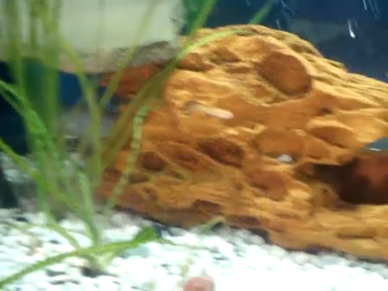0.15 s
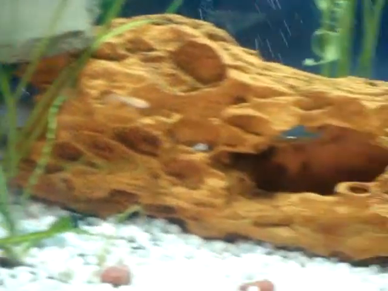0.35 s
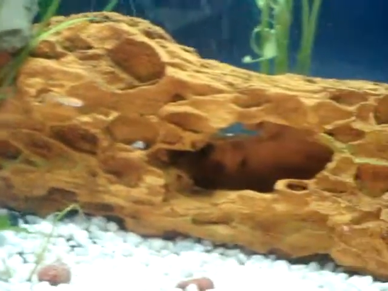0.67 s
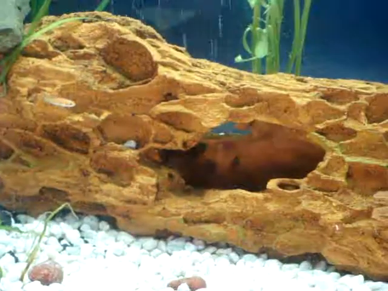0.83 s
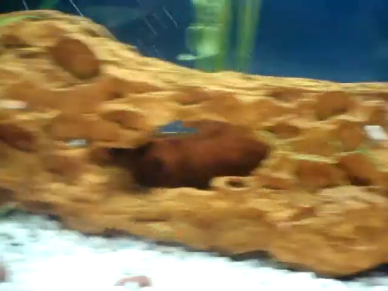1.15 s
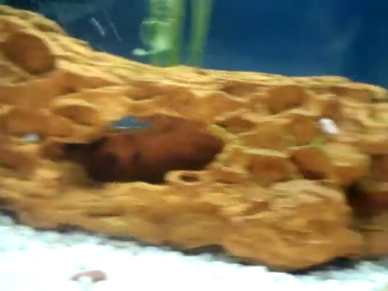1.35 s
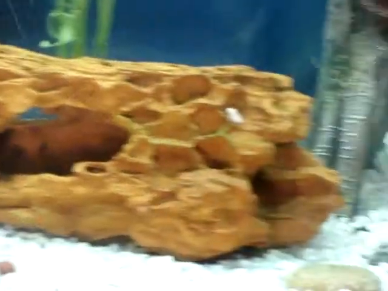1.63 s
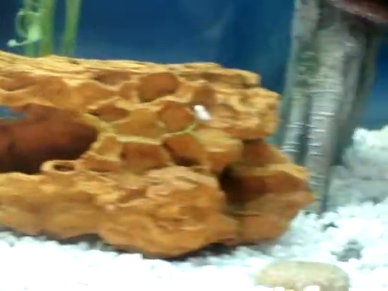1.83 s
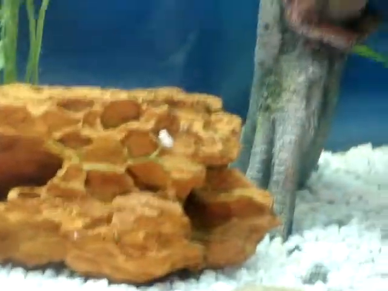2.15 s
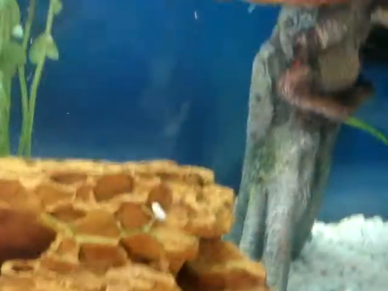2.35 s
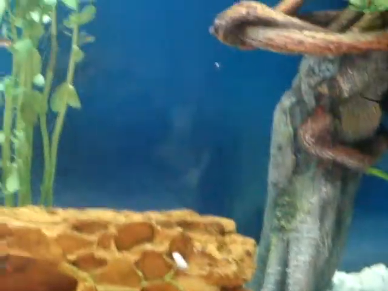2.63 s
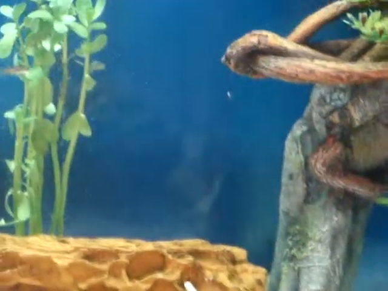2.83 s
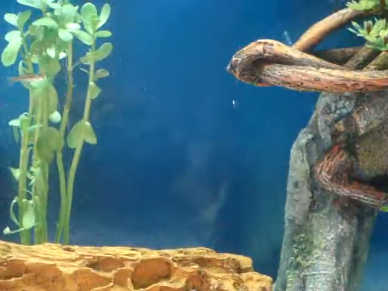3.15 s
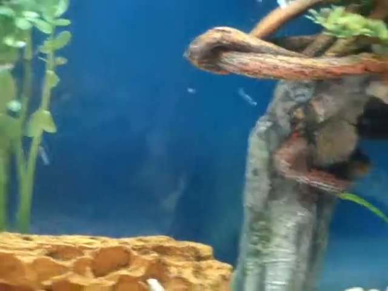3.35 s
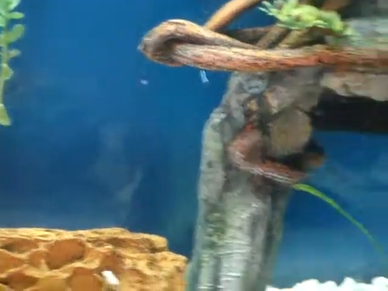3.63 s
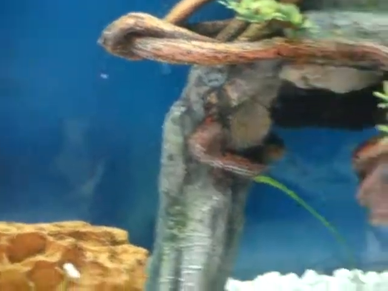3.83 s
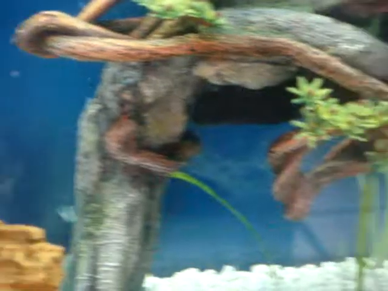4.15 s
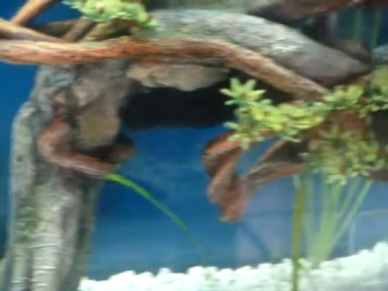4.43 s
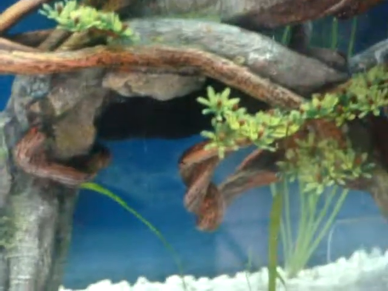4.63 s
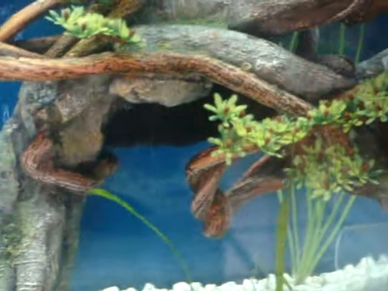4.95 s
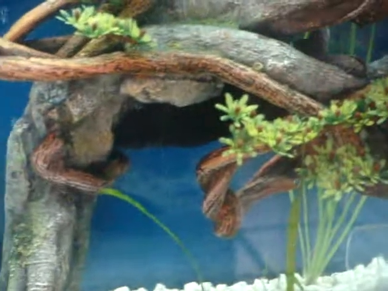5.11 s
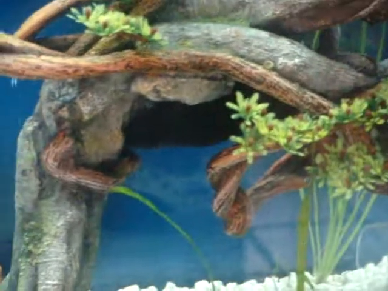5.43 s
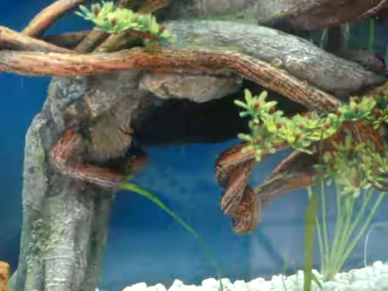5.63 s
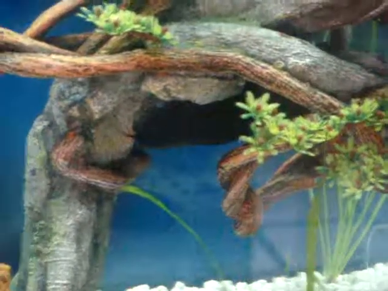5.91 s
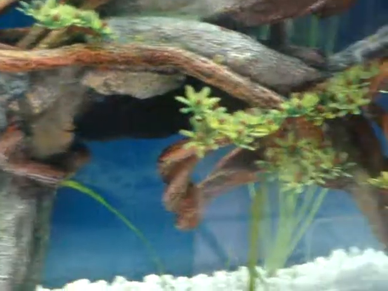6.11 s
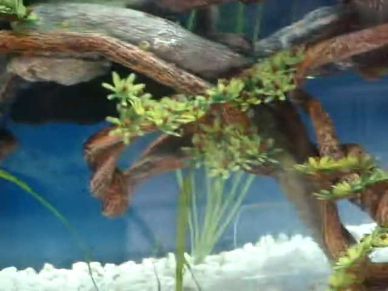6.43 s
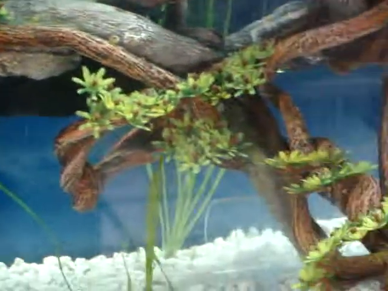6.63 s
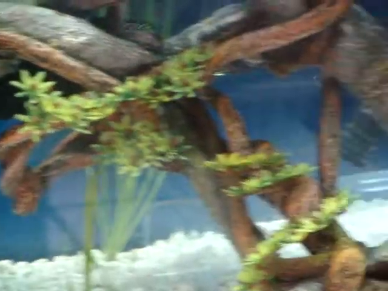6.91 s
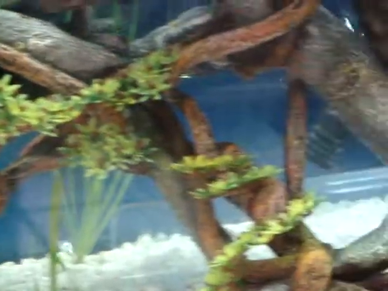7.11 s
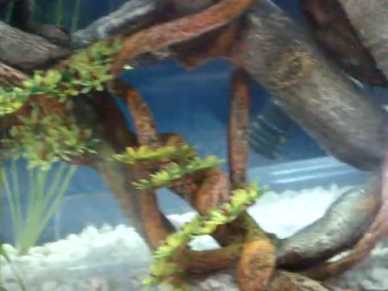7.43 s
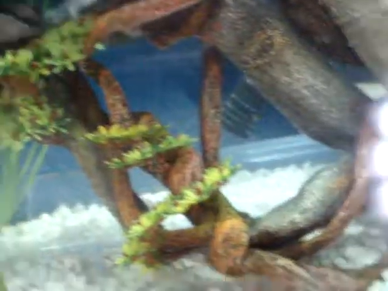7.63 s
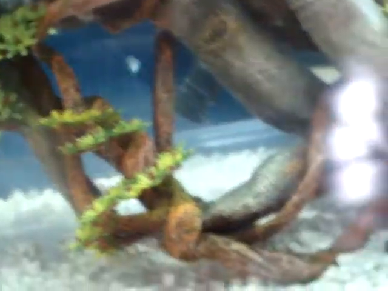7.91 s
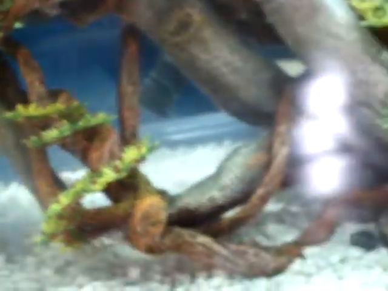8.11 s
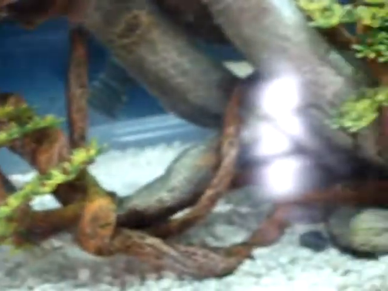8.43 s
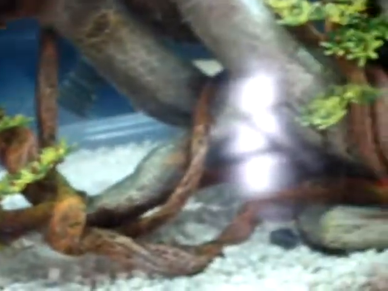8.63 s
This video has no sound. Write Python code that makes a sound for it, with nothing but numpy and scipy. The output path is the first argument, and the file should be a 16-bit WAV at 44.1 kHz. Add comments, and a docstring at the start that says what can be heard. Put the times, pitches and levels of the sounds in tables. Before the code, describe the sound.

Watery bubble pops and bright trickling fizz over a low, steady pump hum, with two tiny dry ticks and one sharp ringing knock near the start.

```python
"""A home aquarium: filter pump tones and filtered-noise flow run throughout, with an outflow trickle of bubble swarms.
Single bubbles, damped sines with gurgle and noise spray, ring and burst over the fizz from early on.
Two sharp ticks, millisecond noise snaps, sound close by near 1 s and 1.2 s.
At 1.5 s something hard scrapes briefly, then clacks against the tank: noise contacts, ringing modes, bright rustle."""
import sys
import numpy as np
from scipy import signal
from scipy.fft import rfft, irfft
from scipy.io import wavfile

SR = 44100
rng = np.random.default_rng(int(sys.argv[2]) if len(sys.argv) > 2 else 0)


def to_wav(s):
    """Save 16-bit WAV."""
    ch = np.atleast_2d(s).T  # columns
    pcm = np.round(np.clip(ch, -1, 1) * 32767)  # PCM
    wavfile.write(sys.argv[1], SR, pcm.astype(np.int16))


N = 386316
T = np.arange(N) / SR
SHOT = T[:SR // 2]  # time axis of one short event

# Colour of bubble spray and of the knock's rustle. Each row: frequency in Hz, relative gain in dB.
SPRAY_COLOUR = [(1000, -21), (2200, -6.5), (3500, -2), (4500, -3.5), (5900, 0.5), (7600, -0.5),
                (10000, -11)]


def undb(db):
    """Decibels to amplitude ratio."""
    return 10 ** (np.asarray(db) / 20)


def level(x, db):
    """Set the rms of a steady sound."""
    return x * undb(db) / np.std(x)


def strength(x, db):
    """Set an event's energy, as the rms it would have if spread over 30 ms."""
    return x * undb(db) / np.sqrt(np.sum(x ** 2) / (0.03 * SR))


def fade(t60_s):
    """Exponential decay, 60 dB in t60_s."""
    return np.exp(-np.log(1000) * SHOT / max(t60_s, 1e-4))


def hiss(t60_s):
    """White noise with exponential decay."""
    return rng.standard_normal(len(SHOT)) * fade(t60_s)


def add(out, start_s, x):
    """Mix an event into out at start_s."""
    i = max(int(start_s * SR), 0)
    out[i:i + len(x)] += x[:max(N - i, 0)]


def colour(x, points, size=4096):
    """Minimum-phase filter through (Hz, dB) points, built by folding the cepstrum."""
    hz, db = np.transpose(points)
    bin_hz = np.maximum(np.arange(size // 2 + 1) * SR / size, 1)
    gain_db = np.interp(np.log(bin_hz), np.log(hz), db)
    cepstrum = irfft(np.log(undb(gain_db)))
    cepstrum[1:size // 2] *= 2
    cepstrum[size // 2 + 1:] = 0
    impulse = irfft(np.exp(rfft(cepstrum)))
    return signal.fftconvolve(x, impulse)[:len(x)]


def echoes(x, hood_db, room_db, hood_t60_s=0.031, room_t60_s=0.14):
    """Direct sound, quick reflections between water, glass and hood, then the room; a new random pattern per call."""
    hood = hiss(hood_t60_s)
    room = hiss(room_t60_s) * (1 - fade(0.01))
    response = undb(hood_db) * hood / np.linalg.norm(hood)
    response += undb(room_db) * room / np.linalg.norm(room)
    response[0] += 1
    return signal.fftconvolve(x, response)[:len(x)]


def pump():
    """Mains multiples and a thin whine, each wavering in level and phase with load, over rushing water as noise."""
    # Multiples of the mains frequency. Each row: multiple, mean rms level in dB.
    hum = [(2, -73.5), (3, -85.5), (4, -63), (5, -62.5), (6, -68), (7, -71.5), (8, -67.5), (10, -66.5),
           (11, -65), (12, -67), (18, -72)]
    # Flow through the filter box. Each row: frequency in Hz, relative gain in dB.
    flow_colour = [(25, -15.5), (65, -9), (100, -8.5), (160, -4.5), (270, -0.5), (400, -1), (540, -1.5),
                   (660, 6.5), (800, -1), (1000, -0.5), (1250, -5), (1550, -2), (2000, -7), (3000, -4.5),
                   (9500, -21)]
    mains_hz, whine_hz, whine_db = 60, 1450.8, -67.5
    waver_db, waver_rad, waver_points = 1.46, 0.096, 60

    out = level(colour(rng.standard_normal(N), flow_colour), -49.5)
    tones = [(k * mains_hz, db) for k, db in hum] + [(whine_hz, whine_db)]
    for hz, db in tones:
        load = np.interp(T, np.linspace(0, T[-1], num=waver_points), rng.standard_normal(size=waver_points))
        amplitude = np.sqrt(2) * undb(db + waver_db * load)
        out += amplitude * np.sin(2 * np.pi * hz * T + waver_rad * load)
    return out


def ring(hz, t60_s, rise, size=len(SHOT)):
    """A bubble's damped sine: swells over the first few cycles; pitch rises by fraction `rise` nearing the surface."""
    t = SHOT[:size]
    pitch_hz = hz * (1 + rise * (1 - np.exp(-2 * t / t60_s)))
    swell = 1 - np.exp(-hz * t / 2)
    decay = np.exp(-np.log(1000) * t / t60_s)
    return swell * np.sin(2 * np.pi * np.cumsum(pitch_hz) / SR) * decay


def swarm(per_s, low_hz, high_hz, cycles, spread_db):
    """Small bubbles of random pitch and strength at random moments, each with a t60 of `cycles` periods."""
    out = np.zeros(N)
    for when, size, force in rng.random((int(per_s * N / SR), 3)):
        hz = min(low_hz * (high_hz / low_hz) ** size, SR / 3)
        db = -spread_db * np.log(max(force, 0.02))  # few are strong
        add(out, when * N / SR, undb(db) * ring(hz, cycles / hz, rise=0.07, size=2048))
    return out


def trickle(spots=4):
    """The outflow breaks the surface at several spots: dense fizz, livelier little pops and soft plinks."""
    # Fizz on the surface. Each row: frequency in Hz, relative gain in dB.
    fizz_colour = [(1200, -30), (2000, -11), (2800, -11), (3600, -3.5), (4500, 1), (5600, 2.5), (7000, 1),
                   (8200, -0.5), (10000, -4.5)]
    fizz = np.zeros(N)
    for _ in range(spots):
        spot = swarm(per_s=260, low_hz=1860, high_hz=10440, cycles=9.7, spread_db=2.0)
        fizz += echoes(spot, hood_db=7.5, room_db=-6.0)
    pops = swarm(per_s=17, low_hz=4760, high_hz=9330, cycles=40, spread_db=2.0)
    plinks = swarm(per_s=6, low_hz=2640, high_hz=4030, cycles=130, spread_db=2.0)

    out = level(colour(fizz, fizz_colour), -50.5)
    out += level(echoes(pops, hood_db=3.0, room_db=4.5), -57.0)
    out += level(echoes(plinks, hood_db=5.0, room_db=7.5), -63.5)
    return out


def bubble(hz, db, spray_db, gurgle_db=1, gurgle_follows=0.24, wobble=0.084, gurgle_cycles=28, count=6):
    """A bubble rings longer the lower its pitch, sheds others near its pitch that gurgle on, and throws a little spray."""
    ref_t60_s, ref_hz, slope = 0.078, 3010, 1.5
    spray_t60_s, spray_attack_s = 0.042, 0.0024
    t60_s = min(ref_t60_s * (ref_hz / hz) ** slope, 0.5)
    note = echoes(ring(hz, t60_s, rise=0.0092), hood_db=-1.5, room_db=-6.0)

    # shed bubbles start within a third of t60_s, weaker the later
    shed = np.zeros(len(SHOT))
    for delay_s in np.linspace(0, t60_s / 3, num=count) * rng.random(count):
        shed_hz = hz * (1 + wobble * rng.uniform(-1.17, 1))
        brief = ring(shed_hz, gurgle_cycles / hz, rise=0)
        delayed = np.pad(brief, (int(delay_s * SR), 0))[:len(SHOT)]
        shed += np.exp(-4 * delay_s / t60_s) * delayed
    gurgle = echoes(shed, hood_db=1.5, room_db=5)

    burst = hiss(spray_t60_s) * (1 - np.exp(-SHOT / spray_attack_s))
    spray = echoes(colour(burst, SPRAY_COLOUR), hood_db=6.0, room_db=-2.5)

    # more spray, more gurgle
    voice = strength(note, 0) + strength(gurgle, gurgle_db + gurgle_follows * spray_db)
    return strength(voice, db) + strength(spray, db + spray_db)


def bubbles():
    """Prominent bubbles at set times; faint ones of random pitch, one at a random moment of each equal time slot."""
    # Each row: start in seconds, pitch in Hz, level in dB, burst spray relative to the ring in dB.
    prominent = [ (.254, 2850, -39.5, -7), (0.458, 3420, -44.5, -12), (.810, 5000, -51, 3),
                 (1.363, 5250, -46, -3), (1.534, 2580, -36.5, -6), (1.546, 3160, -43, -14),
                 (1.864, 2980, -42.5, -22), (1.876, 2635, -46, -24), (1.930, 5560, -48, -6),
                 (2.431, 2925, -40, -13), (2.433, 2570, -42.5, -14), (2.581, 2460, -45.5, -4),
                 (2.829, 5900, -46, -9), (3.015, 5600, -47.5, -3), (3.065, 3410, -48, -6),
                 (3.231, 7780, -47, -5), (3.399, 6170, -42.5, 1), (3.468, 5740, -46.5, -5),
                 (3.675, 3420, -42, -8), (3.799, 5330, -45, -1), (4.277, 3570, -47.5, -12),
                 (4.398, 3430, -47.5, 3.5), (4.902, 2933, -39.5, -24), (4.972, 3120, -45, -23),
                 (5.023, 6170, -48.5, 2), (5.083, 2440, -46, 1), (5.089, 1733, -45.5, -13),
                 (5.115, 5550, -42, -6), (5.204, 7480, -46.5, -8), (5.278, 3510, -48, -1),
                 (5.660, 6770, -45.5, 0), (5.728, 5270, -50, 4), (5.826, 2830, -41, -13),
                 (6.013, 6540, -46.5, 1.5), (6.131, 4260, -45, -6), (6.164, 4310, -48, 3.5),
                 (6.447, 2854, -42.5, -5), (6.668, 5670, -40.5, -23), (6.940, 2655, -43.5, -6),
                 (6.993, 3840, -44, -18), (7.026, 2964, -43, -9), (7.086, 3080, -48, -14),
                 (7.262, 2925, -41.5, -21), (7.319, 4150, -46.5, -19), (7.345, 6600, -49.5, -10),
                 (7.397, 5496, -47.5, 3), (7.575, 3090, -44, -30), (7.853, 2370, -46.5, 2.5),
                 (7.902, 3060, -48, -10), (8.058, 4480, -48.5, -20), (8.338, 3014, -46.5, -7),
                 (8.457, 3360, -47.5, 2.5), (8.469, 2190, -43.5, -18), (8.638, 2180, -39.5, -9),
                 (8.674, 3110, -50, -5)]
    faint_count, faint_low_hz, faint_high_hz = 30, 2990, 8000
    faint_db, faint_spread_db, faint_spray_db = -53, 2, -2.5

    out = np.zeros(N)
    for start_s, hz, db, spray_db in prominent:
        add(out, start_s, bubble(hz, db, spray_db))
    for k, (when, size, force) in enumerate(rng.random((faint_count, 3))):
        start_s = (k + when) * T[-1] / faint_count
        hz = faint_high_hz * (faint_low_hz / faint_high_hz) ** size
        db = faint_db + faint_spread_db * (2 * force - 1)
        add(out, start_s, bubble(hz, db, faint_spray_db))
    return out


def ticks():
    """Dry snaps close to the microphone: an impulse plus noise dying in milliseconds, with weak echoes."""
    # Each row: start in seconds, level in dB.
    tick_rows = [(.9890, -35), (1.1810, -45.5)]
    # Each row: frequency in Hz, relative gain in dB.
    tick_colour = [(290, -52), (500, -13), (1620, -19), (3620, 2), (4770, -11), (5410, -17), (7780, -26),
                   (8710, -19), (10000, -21), (13000, -53), (22000, -120)]
    out = np.zeros(N)
    for start_s, db in tick_rows:
        snap = hiss(0.008)
        snap[0] += 7
        add(out, start_s, strength(echoes(colour(snap, tick_colour), hood_db=-6, room_db=-21), db))
    return out


def knock(ring_db=-3, body_db=-3.5, body_t60_s=0.12, tail_db=-11, tail_t60_s=0.36,
          rustle_db=-35, rustle_t60_s=0.47):
    """Rough contacts excite dense short modes, as noise; the full blow rings clear modes, and a bright rustle trails off."""
    # First touch to full blow. Each row: start in seconds, level in dB, length of the push in seconds.
    contacts = [(1.510, -36, 0.049), (1.612, -17, 0.03), (1.620, -17, 0.013)]
    # Struck tank. Each row: frequency in Hz, relative level in dB, t60 in seconds.
    tank_modes = [(214, -21, 0.65), (250, -18, 0.35), (318, -8, 0.24), (460, -9.5, 0.43), (636, -8, 0.27),
                  (1260, -13, 0.42), (1350, -3, 0.3), (1373, -15, 0.26), (1400, -4, 0.28), (1473, 2, 0.25),
                  (1574, -4, 0.27), (1850, -3, 0.23), (2020, -4, 0.24), (2082, 3, .22), (2134, -1, .23),
                  (3110, 1, 0.18), (3600, -8, .16), (3940, -1, 0.25), (3866, 3.5, 0.2), (5370, -2, 0.18),
                  (6270, -3, .12), (6690, 3.5, 0.094)]
    # Dense modes. Each row: frequency in Hz, relative gain in dB.
    knock_colour = [(71, -78), (120, -57), (297, -12.5), (1030, -9.5), (1170, -11), (1460, -4),
                    (1660, -9.5), (2110, -6), (2450, -13.5), (3750, -6.5), (4770, -14), (5140, -7),
                    (5740, -17), (6530, -11), (10000, -22.5), (13000, -56), (22000, -120)]

    out = np.zeros(N)
    for start_s, db, push_s in contacts:
        tail = colour(hiss(tail_t60_s), [(2000, 4), (4500, 3.5), (8000, -8)])  # slow decay, less treble
        body = colour(hiss(body_t60_s) + undb(tail_db) * tail, knock_colour)
        add(out, start_s, strength(body * (1 - fade(push_s)), db + body_db))

    start_s, db, push_s = max(contacts, key=lambda row: row[1])
    modes = np.zeros(len(SHOT))
    for hz, mode_db, t60_s in tank_modes:
        modes += undb(mode_db) * np.sin(2 * np.pi * (hz * SHOT + rng.random())) * fade(t60_s)
    add(out, start_s, strength(modes * (1 - fade(push_s)), db + ring_db))

    # rustle in uneven grains
    grain_db = 7.2 * np.interp(SHOT, np.linspace(0, 0.5, num=70), rng.standard_normal(size=70))
    rustle = colour(undb(grain_db) * hiss(rustle_t60_s), SPRAY_COLOUR)
    add(out, start_s, strength(rustle * (1 - fade(1.0)), rustle_db))
    return out


def scene():
    """Sum of all sources, alike in both channels."""
    mono = pump() + trickle() + bubbles() + ticks() + knock()
    return np.array([mono, mono])


def record(dry):
    """Steep elliptic low-pass: the recorder cuts the top."""
    top_hz = 10030
    low_pass = signal.ellip(12, 0.2, 70, top_hz, fs=SR, output="sos")  # order, ripple dB, stopband dB
    return signal.sosfilt(low_pass, dry)


dry = scene()
out = record(dry)
to_wav(out)
```